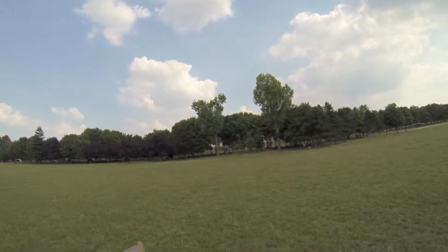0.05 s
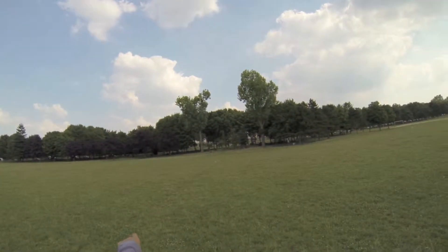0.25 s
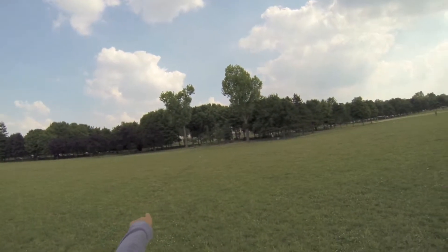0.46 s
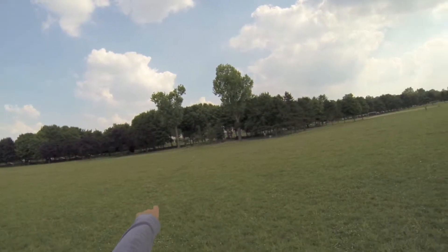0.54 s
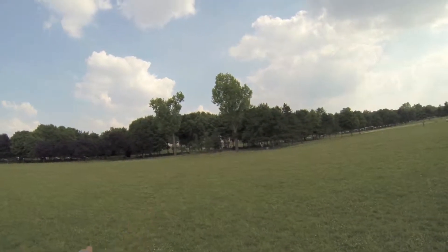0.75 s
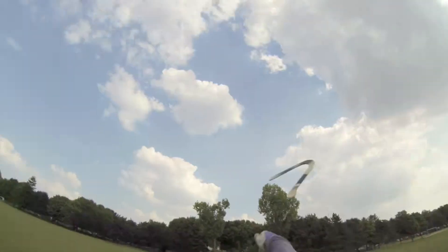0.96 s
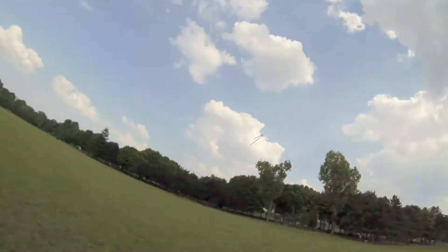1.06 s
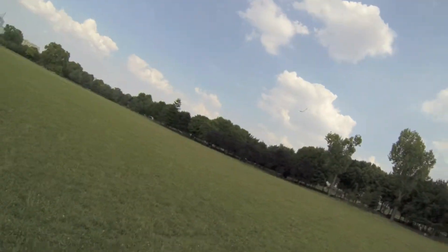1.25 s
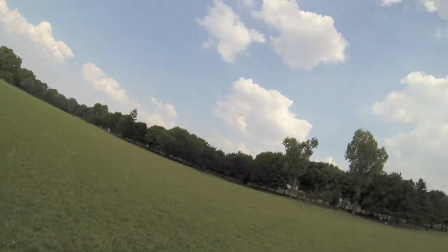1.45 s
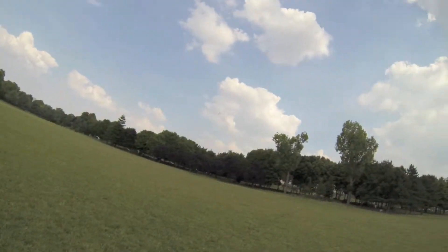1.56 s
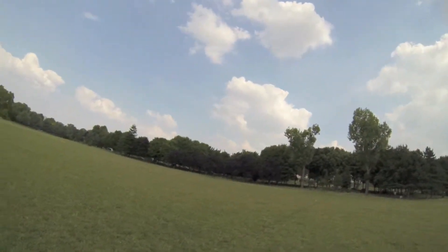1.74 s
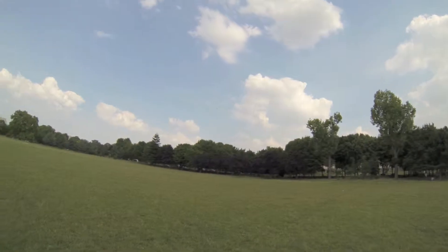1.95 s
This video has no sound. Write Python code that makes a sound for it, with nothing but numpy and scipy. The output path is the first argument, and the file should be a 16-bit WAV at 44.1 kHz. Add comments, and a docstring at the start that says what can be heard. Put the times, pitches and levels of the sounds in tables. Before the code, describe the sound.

The whoosh of a boomerang throw rises in pitch, swells again and sinks, as a few light swishes fade away. It is heard from a microphone on the thrower in an open field, with rumbling wind and faint hiss.

```python
"""A boomerang is thrown in a wide open field, heard from a microphone worn by the thrower.
Its spinning arms cut the air in short bright swishes that fade away. Wind buffets the microphone;
as the body swings, air rushes past and eddies at the port rise in pitch, then swell again
and sink in the follow-through. Underneath lies a bed of far, steady wash and faint hiss."""
import sys
import numpy as np
from scipy import signal
from scipy.fft import rfft, irfft
from scipy.io import wavfile
from scipy.ndimage import uniform_filter1d, map_coordinates

SR = 44100
rng = np.random.default_rng(int(sys.argv[2]) if len(sys.argv) > 2 else 0)


def dump(signal):
    """Clip the signal to [-1, 1] and save it as 16-bit WAV at the path in sys.argv[1]."""
    limited = np.clip(np.atleast_2d(signal).T, -1, 1)
    pcm = np.round(limited * 32767).astype(np.int16)
    wavfile.write(sys.argv[1], SR, pcm)


N = 88200
T = np.arange(N) / SR


def from_db(db):
    """Decibels to gain."""
    return 10 ** (np.asarray(db) / 20)


def shaped_noise(gain_at):
    """Unit-power noise whose gain is a function of frequency."""
    hz = np.maximum(np.arange(N + 1) * SR / (2 * N), 1)
    x = irfft(rfft(rng.standard_normal(2 * N)) * gain_at(hz))[:N]
    return x / np.sqrt(np.mean(x ** 2) + 1e-20)


def noise(colour):
    """Unit-power noise through an EQ curve of (f/Hz, level/dB) points."""
    at, db = np.transpose(colour)
    return shaped_noise(lambda hz: from_db(np.interp(np.log(hz), np.log(at), db)))


def drift(rate_hz):
    """Smooth random wander, spread 1."""
    return shaped_noise(lambda hz: 1 / (1 + (hz / rate_hz) ** 2))


def evened(x, span_s):
    """Hold the power of a noise steady over a short span."""
    size = max(int(span_s * SR), 2)
    return x / np.sqrt(uniform_filter1d(uniform_filter1d(x * x, size), size) + 1e-9)


def swell(at, rise_s, fall_s):
    """Bell-shaped envelope with its own rise and fall."""
    return np.exp(-.5 * ((T - at) / np.where(T < at, rise_s, fall_s)) ** 2)


def far_wash():
    """The distant bed of the open field, fluttering slightly in the wind."""
    # EQ of the open air: f/Hz, level/dB
    colour = [(60, -10.5), (200, -4), (400, -8.5), (600, -4), (760, -4), (930, -0.5), (1130, -2),
              (1400, -10.5), (1650, -10), (1950, -9.5), (2250, -13.5), (2650, -21), (3200, -20.5),
              (4200, -25), (8000, -41)]
    level_db = -44.5 + 0.5 * drift(rate_hz=11) + 0.65 * drift(rate_hz=37)
    return from_db(level_db) * noise(colour)


def microphone_hiss():
    """Faint, flickering hiss that lifts a touch while the microphone moves."""
    # EQ of the hiss: f/Hz, level/dB
    colour = [(100, -8), (3000, 0), (6000, 1.5), (9000, 0), (11000, -0.5), (12000, -6), (12700, -17),
              (13200, -48)]
    # gain ride on the hiss: t/s, level/dB
    lift = [(0.0, -0.5), (0.35, -0.1), (0.48, 0.5), (0.65, 0.6), (1.05, 0.5), (1.25, 0), (2.0, -.5)]
    level_db = -55 + np.interp(T, *np.transpose(lift)) + 0.74 * drift(rate_hz=150)
    return from_db(level_db) * noise(colour)


def buffeting():
    """Lumpy low pressure of the wind on the microphone port."""
    # envelope of the gusts: t/s, level/dB
    gusts = [(0.0,-40.5),(0.06,-33),(0.13,-37.5),(0.22,-32),(0.29,-28),(0.40,-32.5),(0.463,-22.5),(0.56,-29.5),(0.68,-28.5),(0.77,-23.5),(0.875,-18.5),(0.918,-27),(1.005,-14.5),(1.095,-29),(1.134,-22),(1.22,-37),(1.26,-31),(1.34,-39.5),(1.44,-34),(1.55,-40.5),(1.74,-42.5),(2.0,-32)]
    # EQ of the rumble: f/Hz, level/dB
    colour = [(15, -8), (30, -2.5), (60, -1), (90, -8), (130, -12), (200, -22.5), (300, -29.5),
              (500, -44.5), (1200, -58), (8000, -100)]
    envelope = from_db(np.interp(T, *np.transpose(gusts)))
    return envelope * evened(noise(colour), span_s=0.044)


def eddies(gesture, base_hz=200, width=0.39):
    """A narrow band of turbulence, run faster and so higher as the air speeds up."""
    times, pitch, db = np.transpose(gesture)
    core = shaped_noise(lambda hz: 1 / (1 + (np.log(hz / base_hz) / width * 2) ** 4))
    skirt = from_db(-7) * shaped_noise(lambda hz: (hz / base_hz) / (1 + (hz / base_hz) ** 3.84))
    playhead = np.cumsum(np.interp(T, times, pitch) / base_hz)
    flow = map_coordinates(core + skirt, [playhead], order=1, mode="mirror")
    envelope = from_db(np.interp(T, times, db, left=-np.inf, right=-np.inf))
    return envelope * evened(flow, span_s=0.027)


def body_swing():
    """The thrower's swing sheds eddies at the microphone port in two low whooshes."""
    # eddies climbing through the wind-up and throw: t/s, f/Hz, level/dB
    wind_up = [(0.41, 110, -50), (0.445, 126.8, -27), (0.50, 126.5, -31), (0.55, 135, -37.5),
               (0.61, 128.6, -28), (0.64, 149.5, -31), (0.665, 162.4, -20.5), (0.71, 185.3, -17),
               (0.735, 182.3, -25), (0.76, 209.3, -22), (0.79, 291, -18.5), (0.82, 292.7, -21.5),
               (0.85, 252.8, -37), (0.90, 186, -47)]
    # eddies swelling again and sinking: t/s, f/Hz, level/dB
    follow_through = [(0.92, 199.4, -57), (0.955, 227.8, -30.5), (0.972, 248, -24.5), (0.995, 196, -20.5),
                      (1.018, 160, -22), (1.045, 145, -24), (1.07, 140, -61), (1.105, 146, -60),
                      (1.13, 169, -41.5), (1.16, 131, -46)]
    return eddies(wind_up) + eddies(follow_through)


def air_rush(flutter_db=2.0):
    """Broad, fluttering air noise at the fastest moments of the swing."""
    # bursts of air: t/s, level/dB, rise/s, fall/s, centre f/Hz
    bursts = [(0.797, -29.5, .038, 0.037, 390), (0.835, -36, 0.029, 0.031, 820),
              (0.976, -36, 0.043, 0.03, 740), (1.017, -24, 0.013, .02, 330), (1.128, -43, 0.021, .013, 263)]
    # EQ of a burst: multiple of the centre frequency, level/dB
    colour = [(.3, -3.5), (.7, 2), (1.0, 0.5), (1.6, -7.5), (2.6, -14), (3.6, -33), (5.5, -42), (8, -41),
              (30, -74)]
    out = 0
    for at, db, rise, fall, centre in bursts:
        air = noise([(centre * ratio, eq_db) for ratio, eq_db in colour])
        out += from_db(db) * swell(at, rise, fall) * evened(air, span_s=0.016)
    return out * from_db(flutter_db * drift(rate_hz=69))


def boomerang(width_oct=0.48, sheen_db=-24.5):
    """Each pass of a spinning arm cuts the air: a short band of noise with a broad, airy sheen."""
    # passes of the arms, fading away: t/s, level/dB, centre f/Hz
    passes = [(0.926, -41, 2000), (0.981, -46.5, 3100), (1.023, -48, 2570), (1.08, -53.5, 2120),
              (1.18, -56.5, 2060)]
    out = 0
    for at, db, centre in passes:
        air = shaped_noise(lambda hz: np.exp(-.5 * (np.log2(hz / centre) / width_oct) ** 2)
                           + from_db(sheen_db) / (1 + (hz / 12000) ** 10))
        out += from_db(db) * swell(at, rise_s=0.011, fall_s=0.027) * air
    return out


def scene():
    """Wind, throw and background bed, mixed in mono."""
    return (buffeting() + body_swing() + air_rush() + boomerang() + far_wash() + microphone_hiss())[None]


def record(dry):
    """A steep low-pass takes off the top end."""
    cutoff_hz = 13100
    return signal.sosfilt(signal.ellip(10, .1, 80, cutoff_hz, fs=SR, output="sos"), dry)


dry = scene()
out = record(dry)
dump(out)
```